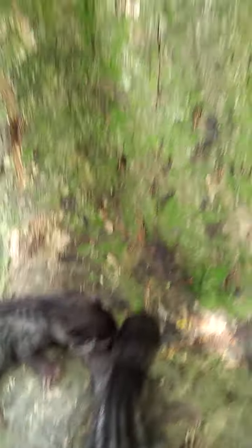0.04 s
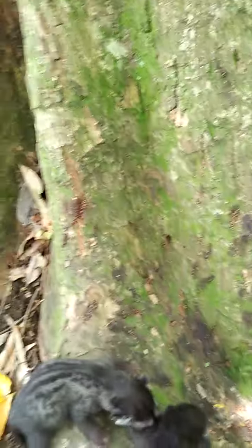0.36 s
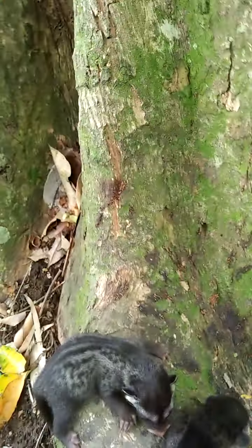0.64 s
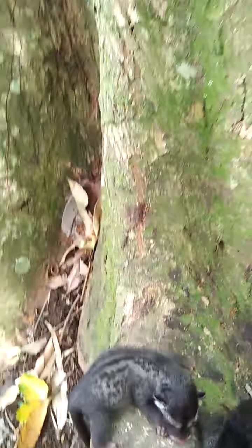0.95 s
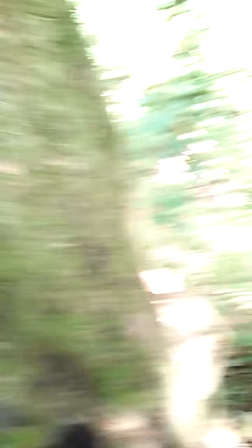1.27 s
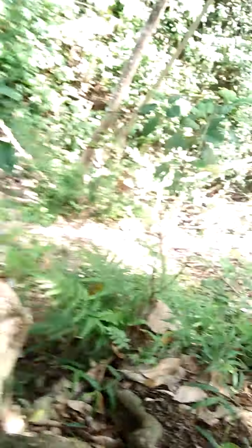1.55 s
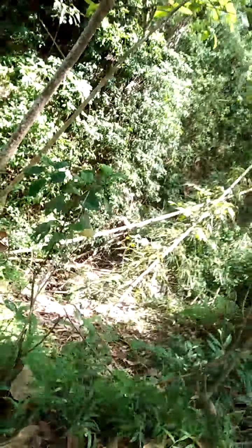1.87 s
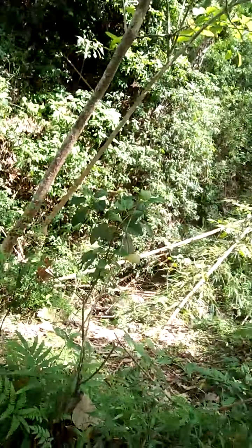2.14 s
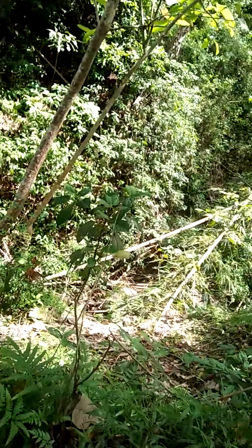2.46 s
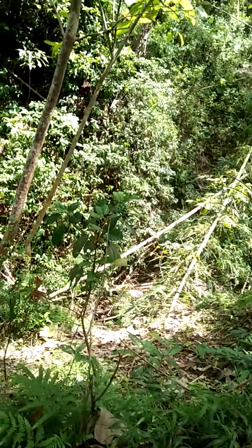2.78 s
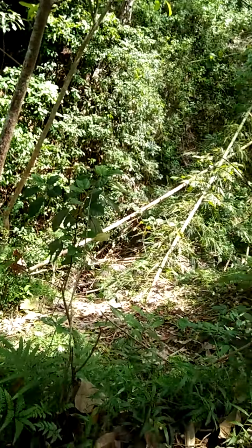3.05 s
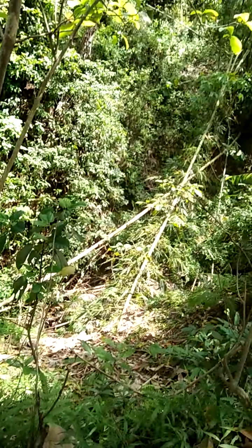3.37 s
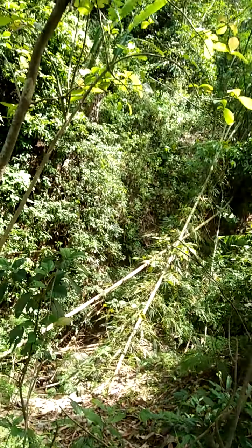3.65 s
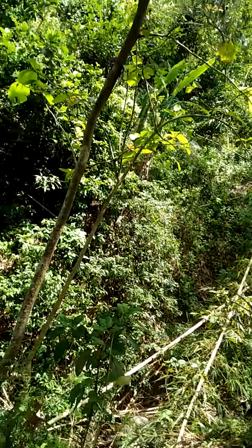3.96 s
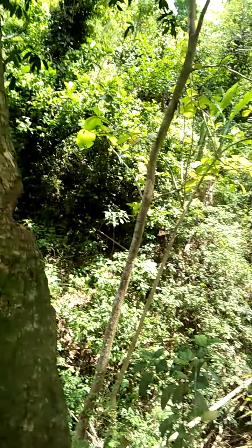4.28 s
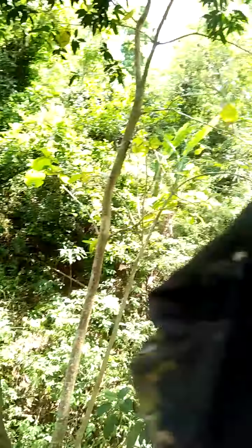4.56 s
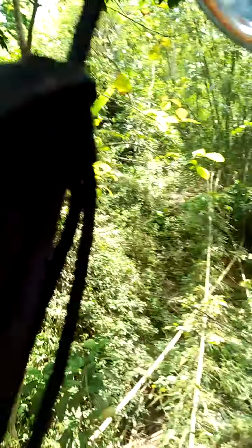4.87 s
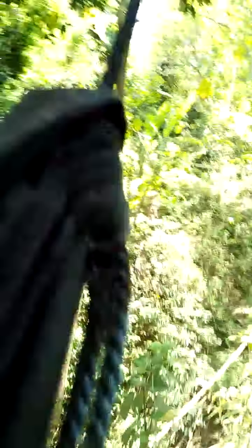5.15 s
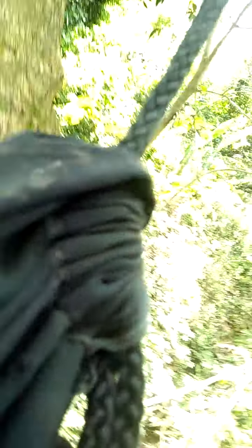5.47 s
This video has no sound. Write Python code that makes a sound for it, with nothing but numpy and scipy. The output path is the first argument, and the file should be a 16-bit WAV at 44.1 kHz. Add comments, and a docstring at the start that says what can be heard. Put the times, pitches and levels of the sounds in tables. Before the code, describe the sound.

Young civets squeal five times, close to the microphone in a forest. Each high call starts raspy, climbs to a clear quivering whistle and sags again. Leaf litter scuffs softly and crunches after the first squeal, and brief faint hisses fill the gaps. A hand rumbles on the microphone underneath, and a louder cluster of crunches comes as the last squeal ends.

```python
"""Young civets squeal five times, close by, at the foot of a forest tree. From the start the trees return
a faint, short echo, the leaf litter scuffs softly and a hand rumbles on the microphone. Each squeal
starts raspy as the vocal folds close unevenly, climbs to a clear quivering whistle near 2 kHz, sags
and ends in a small upward flick. After the first, at 0.65 s, the litter crunches; brief high hisses fill
the gaps from then on. One light crunch comes at 2.5 s, a louder cluster at 5.6 s as the last squeal ends."""
import sys
import numpy as np
from scipy import signal
from scipy.fft import rfft, irfft
from scipy.io import wavfile
from scipy.ndimage import uniform_filter1d

SR = 44100
rng = np.random.default_rng(int(sys.argv[2]) if len(sys.argv) > 2 else 0)


def inscribe(sig):
    """Save sig as 16-bit PCM at rate SR to the path in sys.argv[1].

    A 1-D sig is mono; a 2-D sig holds one channel per row.
    Samples are clipped to [-1, 1] before scaling.
    """
    pcm = np.round(np.clip(np.atleast_2d(sig).T, -1, 1) * 32767)
    wavfile.write(sys.argv[1], SR, pcm.astype(np.int16))


N = 252252
TIME_S = np.arange(N) / SR
CUTOFF_HZ = 14500

# melody, one table per squeal: time_s, pitch_hz
MELODIES = [
    [(-0.0, 1880), (0.038, 2048), (0.058, 1890), (0.117, 1896), (0.228, 2060), (0.275, 1733), (0.302, 1754),
     (0.347, 1618), (0.439, 1862), (0.465, 1765), (0.546, 1550)],
    [(0.88, 914), (1.035, 1216), (1.156, 1322), (1.183, 1750), (1.244, 1986), (1.314, 1824), (1.379, 1656),
     (1.43, 1764), (1.514, 1874), (1.613, 1699), (1.641, 1420), (1.68, 1320), (1.696, 1414)],
    [(2.01, 846), (2.092, 938), (2.158, 1265), (2.169, 1273), (2.216, 1680), (2.279, 1666), (2.312, 1894),
     (2.365, 1835), (2.505, 2084), (2.558, 1800), (2.667, 2008), (2.752, 1872), (2.77, 2010), (2.896, 1745),
     (2.983, 1722), (3.066, 1489), (3.134, 1310), (3.146, 1444)],
    [(3.48, 1179), (3.516, 1680), (3.539, 1527), (3.593, 1930), (3.667, 1938), (3.773, 2458), (3.831, 2175),
     (3.961, 2555), (4.025, 2327), (4.039, 2467), (4.216, 2335), (4.249, 2150), (4.344, 1956),
     (4.392, 2047), (4.502, 1515)],
    [(4.845, 1382), (4.887, 1923), (4.931, 1917), (5.043, 1252), (5.113, 1245), (5.224, 1453),
     (5.322, 2156), (5.348, 1991), (5.431, 2110), (5.521, 2338), (5.543, 2068), (5.637, 1458),
     (5.719, 1316)],
]
# effort, one table per squeal: time_s, level_db, throat_ring_share_db
EFFORTS = [
    [(0.0, -16, -7), (0.028, -24, -2), (0.138, -18.5, -15.5), (0.154, -20, -3), (0.24, -13.5, -14.5),
     (0.254, -14.5, -27), (0.284, -22.5, -15.5), (0.372, -18.5, -6.5), (0.42, -16, -25),
     (0.494, -15.5, -22.5), (0.512, -22.5, -8), (0.548, -22.5, -8.5), (0.6, -67, -8)],
    [(0.85, -71, -40), (0.934, -58, -22), (1.004, -31, -6), (1.212, -22.5, -20), (1.232, -24, -3.5),
     (1.34, -13.5, -26), (1.44, -12, -22), (1.456, -9, -22), (1.554, -13, -16), (1.584, -9.5, -35),
     (1.622, -14.5, -9), (1.688, -20, -6), (1.73, -77, -4)],
    [(1.98, -77, -21), (2.022, -28.5, -12.5), (2.132, -23, -13), (2.162, -10.5, -20), (2.19, -18.5, -14.5),
     (2.436, -14, -15), (2.468, -15.5, -3.5), (2.59, -11.5, -14), (2.654, -15.5, -6), (2.878, -12.5, -1),
     (3.018, -17.5, -4), (3.138, -28.5, -2.5), (3.18, -82, -18)],
    [(3.45, -70, -23), (3.488, -31.5, -5.5), (3.512, -29.5, -1.5), (3.71, -13.5, -2.5), (3.722, -17.5, -11),
     (3.804, -17, -13.5), (3.822, -15, -5.5), (3.928, -13.5, -19), (4.192, -14.5, -16.5), (4.412, -23, -6),
     (4.45, -13.5, -0.5), (4.494, -24, -4.5), (4.54, -63.5, 2)],
    [(4.81, -76, -41), (4.854, -33.5, 1), (4.972, -27, -8), (4.992, -27, 7), (5.014, -36, -2),
     (5.11, -34.5, -1.5), (5.22, -36, -7), (5.302, -21, -7), (5.44, -21, 3.5), (5.51, -25.5, -39),
     (5.534, -20, -1.5), (5.668, -30.5, -4.5), (5.71, -41, -9)],
]
# voice, one row per squeal: clears_s, closes_s, breakup_s, larynx_db, low_throat_db, edge_share_db
VOICES = [(0.0, 0.561, .012, -45, -49.5, -6), (1.127, 1.697, .012, -48, -43.5, -9),
          (2.115, 3.154, 0.0085, -44.5, -39.5, -7.5), (3.495, 4.511, 0.023, -43, -38.5, -12),
          (4.89, 5.73, 0.085, -43.5, -36.5, -13.5)]
# pitch quivers: start_s, decay_s, rate_hz, depth_ratio
QUIVER_BOUTS = [(0.155, .12, 23, 0.022), (1.099, .06, 14.7, 0.1), (1.233, .12, 31, .046),
                (2.022, .07, 14, 0.09), (2.232, .05, 19, 0.035), (2.361, .11, 23.2, 0.025),
                (2.719, .04, 31, 0.045), (3.572, .1, 32, 0.038), (3.794, .12, 25.9, 0.047),
                (4.083, 0.15, 19, 0.0092), (4.853, .12, 27.5, .038)]
# period doubling: start_s, end_s
DOUBLING_SPANS = [(2.31, 2.43), (2.53, 2.63), (3.88, 4.02), (4.03, 4.2)]
# response of the small mouth: freq_hz, gain_db
MOUTH_RESPONSE = [(900, -18), (1400, -7.5), (2000, -27.5), (2700, -7.5), (3400, -38), (4200, -11),
                  (5200, 6.5), (6200, 10), (7200, 2), (8200, 10), (9400, 9), (10500, 2), (12200, -3.5),
                  (14200, -6)]
# air rushing through the narrow throat: freq_hz, gain_db
BREATH_SPECTRUM = [(1000, -45), (3000, -32), (4500, -33), (5600, -10), (7500, -1), (9300, 8), (11500, 0),
                   (14200, -3)]
# borders between larynx tone, lower throat, throat ring, mouth ring and edge: freq_hz
BAND_BORDERS_HZ = [3000, 4300, 6700, 10800]
# nearby bark and ground: delay_s, gain_ratio
NEAR_REFLECTIONS = [(.0011, 0.12), (.0027, 0.18), (.0062, .08)]
# litter scuffs: centre_s, sigma_s, level_db
SCUFF_SWELLS = [(.01, 0.024, -55.5), (.17, 0.055, -59), (.525, 0.029, -57.5), (.69, 0.093, -66.5),
                (.98, 0.1, -62), (1.2, 0.0081, -64.5), (1.55, 0.071, -63), (1.87, 0.027, -59),
                (2.56, 0.038, -63), (2.71, 0.019, -66), (3.55, 0.19, -61), (5.38, 0.044, -64.5),
                (5.645, 0.062, -54.5)]
# scuff colour: freq_hz, gain_db
SCUFF_SPECTRUM = [(200, -11), (300, -6.5), (470, -4), (700, -2), (1200, 0), (1800, -1.5), (2600, -12.5),
                  (5000, -27), (9000, -11.5), (14000, -24.5)]
# hand shifts: centre_s, sigma_s, level_db
HAND_SWELLS = [(.04, 0.089, -53.5), (.28, 0.039, -49.5), (.48, .03, -52.5), (1.6, .12, -53.5),
               (1.86, 0.032, -44.5), (2.13, 0.14, -43), (2.67, 0.058, -49), (3.13, 0.18, -48.5),
               (3.53, 0.071, -38), (3.8, 0.18, -41.5), (4.86, 0.11, -57), (5.12, 0.025, -33.5),
               (5.27, 0.084, -44)]
# rumble colour: freq_hz, gain_db
HAND_SPECTRUM = [(25, -32), (38, -5.5), (55, 7.5), (72, 3.5), (100, -2), (130, -11), (180, -18.5),
                 (260, -43)]
# litter giving way: time_s, level_db, thud_share_db, centre_hz
CRUNCH_EVENTS = [(0.649, -32, 6, 1110), (0.666, -32, 2, 985), (0.676, -36, 8, 1410),
                 (0.692, -36.5, -24, 947), (0.706, -39.5, 9, 1250), (0.749, -37, 16.5, 1210),
                 (2.484, -40.5, -18, 1960), (5.614, -28, -26, 1281), (5.629, -25, -32, 1900),
                 (5.644, -23.5, -45, 2150), (5.656, -41, -36, 1850), (5.66, -18.5, -45, 1670)]
# litter resonances: centre_ratio, width_hz, gain_db
LITTER_MODES = [(.76, 290, 13), (1, 317, 18), (1.35, 416, 13.5)]
# hisses between squeals: centre_s, sigma_s, level_db
HISS_SWELLS = [(.7, 0.04, -50.5), (1.85, 0.091, -53), (1.94, 0.022, -42.5), (3.33, 0.11, -58.5),
               (4.57, 0.052, -58)]
# hiss colour: freq_hz, gain_db
HISS_SPECTRUM = [(2000, -10.5), (4500, -16), (6500, -15.5), (8700, -2), (11000, -9), (14000, -13.5)]


def from_db(db):
    """Decibels to gain."""
    return 10 ** (np.asarray(db) / 20)


def unit_rms(x):
    """Scale to unit power."""
    return x / np.sqrt(np.mean(x ** 2) + 1e-20)


def glide(rows, t):
    """Cubic path through the rows, no overshoot."""
    times, values = np.transpose(sorted(rows))
    step_s = np.maximum(np.diff(times), 1e-4)
    slope = np.diff(values) / step_s
    before, after = slope[:-1], slope[1:]
    tangent = np.r_[slope[0], 2 * np.maximum(before * after, 0) / (before + after + 1e-9), slope[-1]]
    i = np.clip(np.searchsorted(times, t) - 1, 0, len(step_s) - 1)
    u = np.clip((t - times[i]) / step_s[i], 0, 1)
    bend = (1 - u) * (tangent[i] - slope[i]) - u * (tangent[i + 1] - slope[i])
    return values[i] + step_s[i] * u * (slope[i] + (1 - u) * bend)


def gain_at(spectrum, hz):
    """Spectrum gain, interpolated over log frequency."""
    freq_hz, gain_db = np.transpose(spectrum)
    return from_db(np.interp(np.log(hz + 1e-9), np.log(freq_hz), gain_db))


def drift(rate_hz, size):
    """Smooth random motion, unit RMS."""
    hz = np.fft.rfftfreq(size, 1 / SR)
    return unit_rms(irfft(rfft(rng.standard_normal(size)) / np.sqrt(1 + (hz / rate_hz) ** 6), size))


def noise(spectrum):
    """Coloured noise, unit RMS, rolled off past the table's ends."""
    hz = np.fft.rfftfreq(N, 1 / SR)
    rolloff = np.minimum(hz / spectrum[0][0], 1) ** 2 / np.maximum(hz / spectrum[-1][0], 1) ** 4
    return unit_rms(irfft(rfft(rng.standard_normal(N)) * gain_at(spectrum, hz) * rolloff, N))


def swells(rows, floor_db):
    """Gaussian swells over a steady floor, summed in power."""
    power = sum(from_db(db) ** 2 * np.exp(-((TIME_S - centre_s) / sigma_s) ** 2)
                for centre_s, sigma_s, db in rows)
    return np.sqrt(from_db(floor_db) ** 2 + power)


def resonance(force, hz, width_hz):
    """Two-pole band-pass."""
    radius, angle = np.exp(-np.pi * width_hz / SR), 2 * np.pi * hz / SR
    return signal.lfilter([.5, 0, -.5], [1, -2 * radius * np.cos(angle), radius ** 2], force + 1e-18)


def fold_rasp(t, melody, clears_s, closes_s, breakup_s, clearing_s=.02, settle_db_per_s=17):
    """Uneven fold closure, 0 to 1: strong at both ends and on pitch leaps, settling on held notes."""
    clear_age_s = np.maximum(t - clears_s, 0)
    onset = from_db(-6) * np.exp(-clear_age_s / clearing_s)
    held = from_db(-21 - settle_db_per_s * clear_age_s)
    octaves_per_s = uniform_filter1d(np.gradient(np.log2(glide(melody, t)), t), int(.035 * SR))
    leap = (np.abs(octaves_per_s) / 10) ** 6.1
    ending = from_db(-5) * np.exp(np.minimum(t - closes_s, 0) / breakup_s)
    return np.minimum(np.sqrt(onset ** 2 + held ** 2 + leap ** 2 + ending ** 2), 1)


def larynx_pitch(t, melody, rasp, closes_s, lead_s=.025, flick_s=.008):
    """Quivering pitch in Hz: drops in as the larynx opens, flicks up as it closes."""
    bend = .007 * drift(24, len(t))
    bend += (.001 + .011 * np.sqrt(rasp)) * drift(69, len(t))
    for start_s, decay_s, rate_hz, depth in QUIVER_BOUTS:
        age_s = np.maximum(t - start_s, 0)
        bend += depth * np.sin(2 * np.pi * rate_hz * age_s) * np.exp(-(age_s / decay_s) ** 2)
    bend += .3 * np.clip((melody[0][0] - t) / lead_s, 0, 1)
    bend += .2 * np.exp(-((t - closes_s) / flick_s) ** 2)
    return glide(melody, t) * np.exp(bend)


def vocal_folds(t, pitch_hz, rasp, jitter_rad=.22, doubling_db=-27, harmonics=16):
    """Mouth-shaped harmonics and an air puff per opening; rasp makes the cycles uneven."""
    phase = 2 * np.pi * np.cumsum(pitch_hz) / SR + jitter_rad * rasp * drift(250, len(t))
    doubled = sum(np.clip(np.minimum(t - start_s, end_s - t) / .0086, 0, 1)
                  for start_s, end_s in DOUBLING_SPANS)
    flutter_db = 3.5 + 4 * np.sqrt(rasp)
    tone = 0
    for k in range(1, harmonics + 1):
        flutter = from_db(flutter_db * drift(41, len(t)))  # pulse shape keeps changing
        half_harmonic = doubled * from_db(doubling_db) * np.exp(-(k - 3.2) ** 2)
        for multiple, gain in ((k, flutter), (k + .5, half_harmonic)):
            hz = multiple * pitch_hz
            lag_rad = np.pi * multiple ** 2 / 6  # mouth ringing smears the pulse over the cycle
            antialias = np.clip(6 - 12 * hz / SR, 0, 1)
            tone += gain * gain_at(MOUTH_RESPONSE, hz) * antialias * np.sin(multiple * phase - lag_rad)
    puffs = rng.standard_normal(len(t)) * (1 + np.cos(phase))
    breath_colour = gain_at(BREATH_SPECTRUM, np.fft.rfftfreq(len(t), 1 / SR))
    breath = unit_rms(irfft(rfft(puffs) * breath_colour, len(t)))
    shimmer = 1 + .32 * rasp * drift(200, len(t))
    return tone * shimmer + 1.8 * rasp ** .68 * breath


def band_gains(t, melody, effort, rasp, larynx_db, low_throat_db, edge_db, growth_db_per_s=7.5):
    """Gains of the five voice bands; effort beyond the two low ones goes into the rings and edge."""
    times, *columns = np.transpose(effort)
    curves_db = np.array([np.interp(t, times, column) for column in columns])
    level, throat = from_db(uniform_filter1d(curves_db, int(.0037 * SR), axis=1))
    # low bands grow along the squeal, swell as pitch sinks, thin with rasp
    remaining_s = np.maximum(melody[-1][0] - t, 0)
    sunk_octaves = np.minimum(np.log2(1800 / glide(melody, t)), .55)
    low = from_db(9 * sunk_octaves - growth_db_per_s * remaining_s - 10.5 * rasp)
    larynx, low_throat = low * from_db(larynx_db), low * from_db(low_throat_db)
    edge = from_db(edge_db) * (10 * rasp) ** .088
    mouth = np.sqrt(np.maximum(1 - throat ** 2 - edge ** 2, .15))
    scale = level / np.sqrt(level ** 2 + larynx ** 2 + low_throat ** 2)
    return scale * np.array([larynx, low_throat, level * throat, level * mouth, level * edge])


def shape_bands(voice, gains, window_s=.013, wander_db=.8):
    """Even out each voice band, then apply its gain with a slight wander."""
    size = len(voice)
    hz, spectrum = np.fft.rfftfreq(size, 1 / SR), rfft(voice)
    above = [1] + [(1 + np.tanh((hz - border) / 160)) / 2 for border in BAND_BORDERS_HZ + [CUTOFF_HZ]]
    shaped = 0
    for gain, above_low, above_high in zip(gains, above, above[1:]):
        band = irfft(spectrum * (above_low - above_high), size)
        floor = .06 * np.mean(band ** 2)  # near-empty stretches stay quiet
        power = uniform_filter1d(band ** 2, int(window_s * SR)) + floor
        shaped += gain * from_db(wander_db * drift(14, size)) * band / np.sqrt(power)
    return shaped


def squeal(melody, effort, manner, fade_s=.01, tremor_db=1.0):
    """One call through throat and mouth, trembling when strained. Rows: sound, rasp."""
    clears_s, closes_s, breakup_s, *bands_db = manner
    active = (TIME_S >= effort[0][0]) & (TIME_S <= effort[-1][0])
    t = TIME_S[active]
    rasp = fold_rasp(t, melody, clears_s, closes_s, breakup_s)
    voice = vocal_folds(t, larynx_pitch(t, melody, rasp, closes_s), rasp)
    voice += sum(gain * np.interp(t - delay_s, t, voice) for delay_s, gain in NEAR_REFLECTIONS)
    voice *= np.clip(np.minimum(t - t[0], t[-1] - t) / fade_s, 0, 1)
    voice = shape_bands(voice, band_gains(t, melody, effort, rasp, *bands_db))
    voice *= from_db(tremor_db * np.sqrt(rasp) * drift(50, len(t)))
    tracks = np.zeros((2, N))
    tracks[:, active] = voice, rasp
    return tracks


def forest_echo(sound, t60_s=.3, level_db=-25, rise_s=.014):
    """Trunks and leaves scatter a thin, short echo."""
    age_s = TIME_S[:SR]
    tail = rng.standard_normal(SR) * from_db(-60 * age_s / t60_s) * np.minimum(age_s / rise_s, 1)
    return from_db(level_db) * signal.fftconvolve(sound, tail / np.sqrt(np.sum(tail ** 2)))[:N]


def litter_scuffs(gain_db=6.0, flicker_db=3.3):
    """Soft shuffling in the leaves: swells of midrange noise."""
    flicker = from_db(gain_db + flicker_db * drift(30, N))
    return swells(SCUFF_SWELLS, floor_db=-78.5) * flicker * noise(SCUFF_SPECTRUM)


def hand_rumble(gain_db=-.5, lumps_db=3):
    """A shifting hand puts lumpy bass into the microphone."""
    lumps = from_db(gain_db + lumps_db * drift(12, N))
    return swells(HAND_SWELLS, floor_db=-74) * lumps * noise(HAND_SPECTRUM)


def litter_crunches(gain_db=-13.0, crumble_s=.01, thud_hz=497, damping_hz=2300):
    """Litter gives way: a snap and short crumble over a ground thud, dulled by damp leaves."""
    track, age_s = np.zeros(N), TIME_S[:SR // 20]
    for time_s, level_db, thud_db, centre_hz in CRUNCH_EVENTS:
        force = .051 * rng.laplace(size=len(age_s)) * np.exp(-age_s / crumble_s)
        force[0] += 1  # snap
        leaves = sum((-1) ** k * from_db(mode_db) * resonance(force, ratio * centre_hz, width_hz)
                     for k, (ratio, width_hz, mode_db) in enumerate(LITTER_MODES))
        ground = from_db(thud_db - 1) * resonance(force, thud_hz, width_hz=180)
        start = int((time_s + .0012) * SR)
        track[start:start + len(age_s)] += from_db(level_db + gain_db) * (leaves + ground)[:N - start]
    return signal.sosfilt(signal.butter(2, damping_hz, fs=SR, output="sos"), track)


def high_hiss(gain_db=-3.0, crackle_db=2.5):
    """Brief swells of crackly treble noise between squeals."""
    crackle = from_db(gain_db + crackle_db * drift(120, N))
    return swells(HISS_SWELLS, floor_db=-78.5) * crackle * noise(HISS_SPECTRUM)


def scene(width_db=-3, side_delay_s=.0019):
    """Near-mono mix: rasp spreads the treble, the whistle stays central."""
    squeals, rasp = sum(squeal(*call) for call in zip(MELODIES, EFFORTS, VOICES))
    near = squeals + litter_crunches()
    mid = near + forest_echo(near) + litter_scuffs() + hand_rumble() + high_hiss()
    treble = signal.sosfilt(signal.butter(8, 6500, "high", fs=SR, output="sos"), mid)
    spread = from_db(width_db) * rasp * signal.windows.tukey(N, .01)
    side = spread * np.roll(treble, int(side_delay_s * SR))
    return np.array([mid + side, mid - side])


def record(dry):
    """Steep low-pass."""
    return signal.sosfilt(signal.ellip(10, .2, 80, CUTOFF_HZ, fs=SR, output="sos"), dry)


dry = scene()
out = record(dry)
inscribe(out)
```